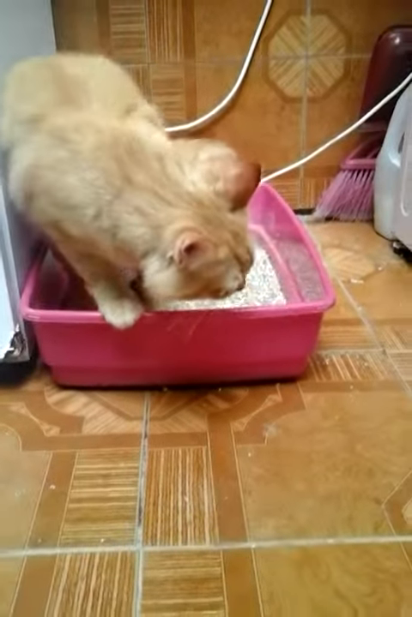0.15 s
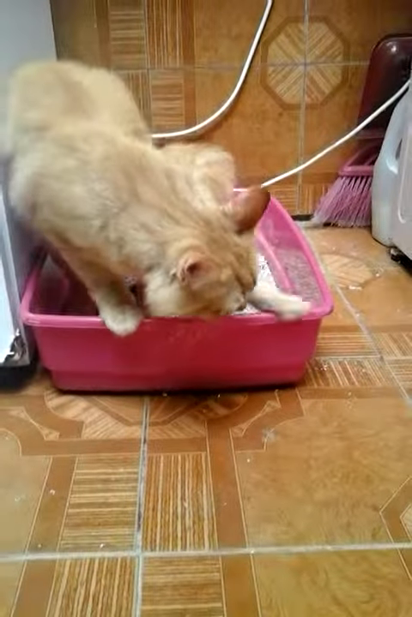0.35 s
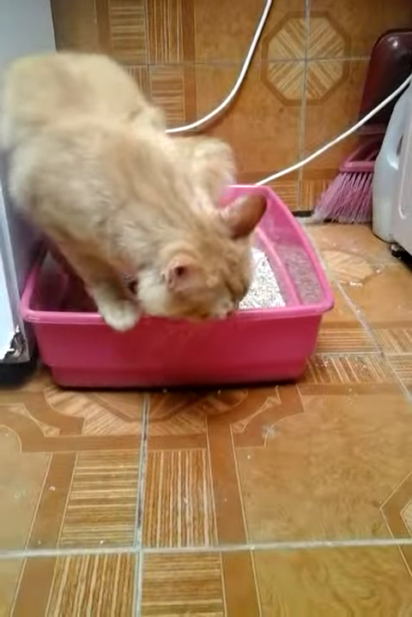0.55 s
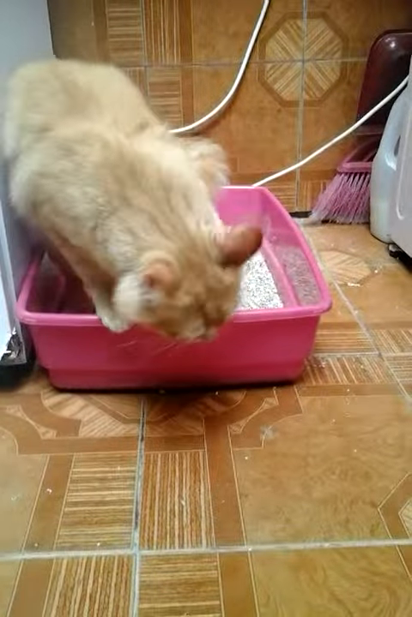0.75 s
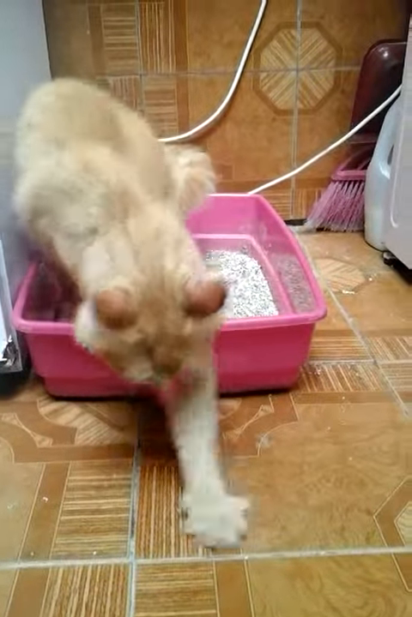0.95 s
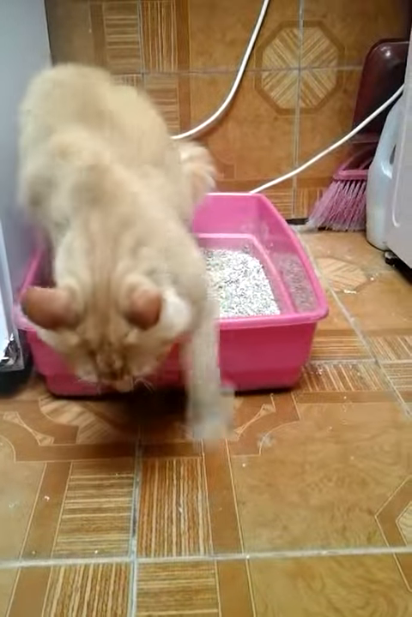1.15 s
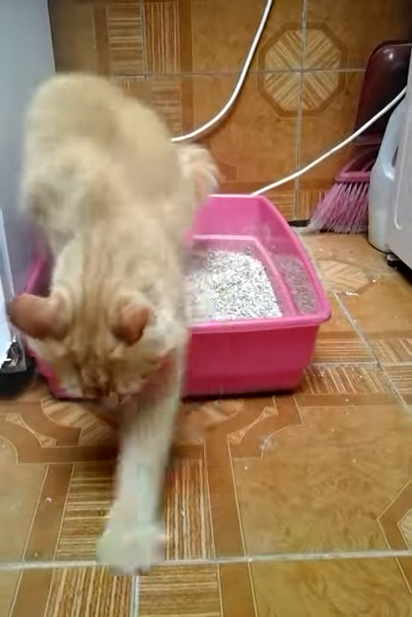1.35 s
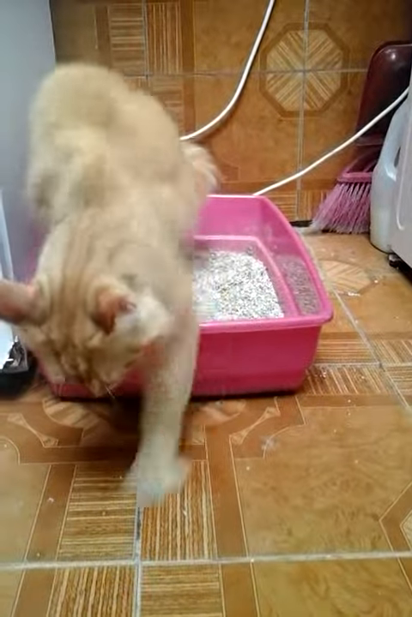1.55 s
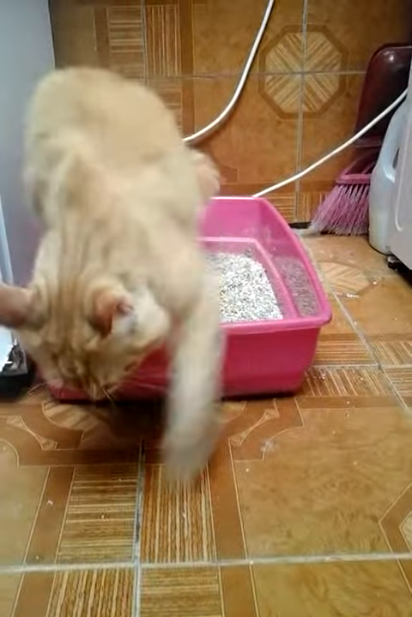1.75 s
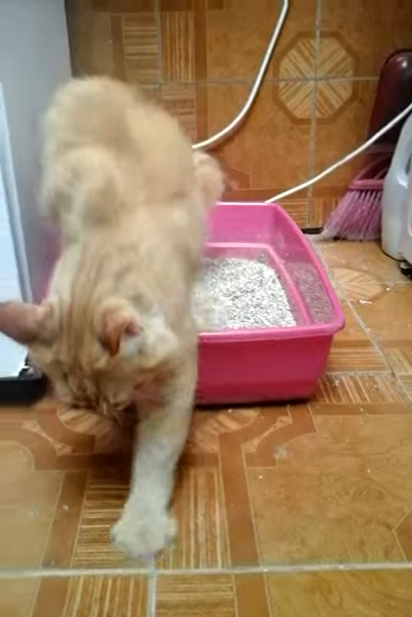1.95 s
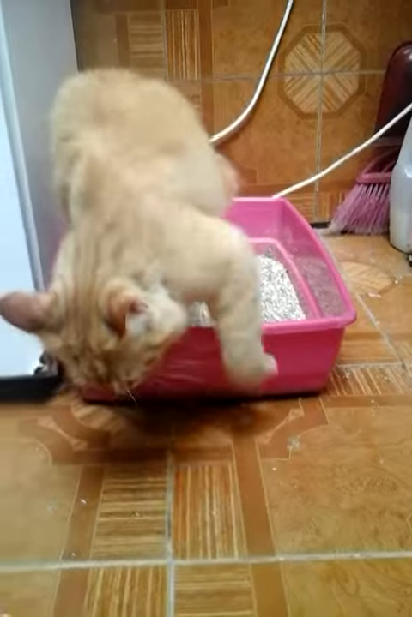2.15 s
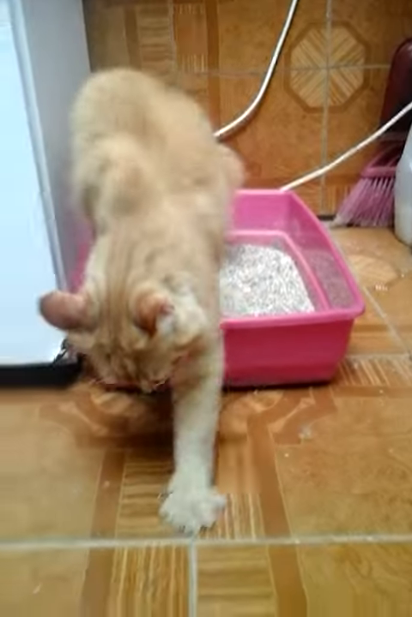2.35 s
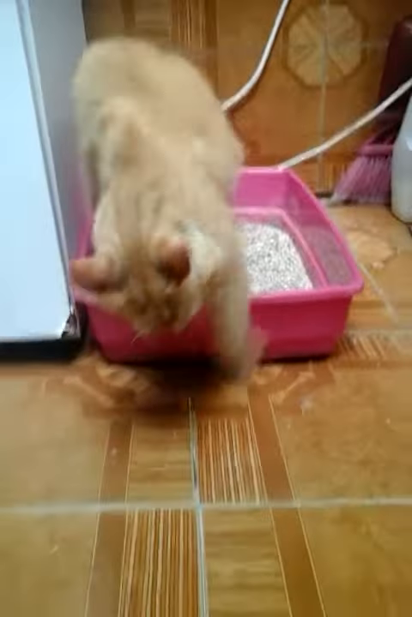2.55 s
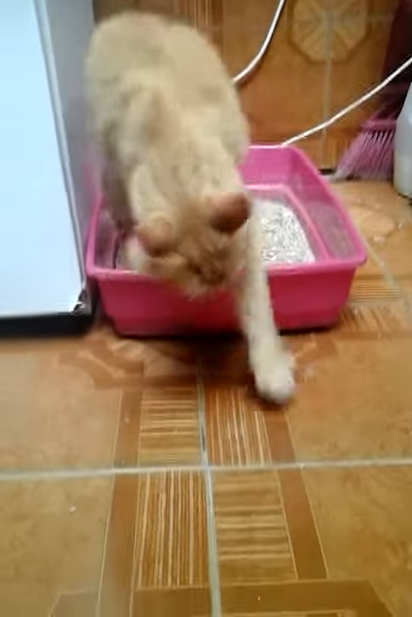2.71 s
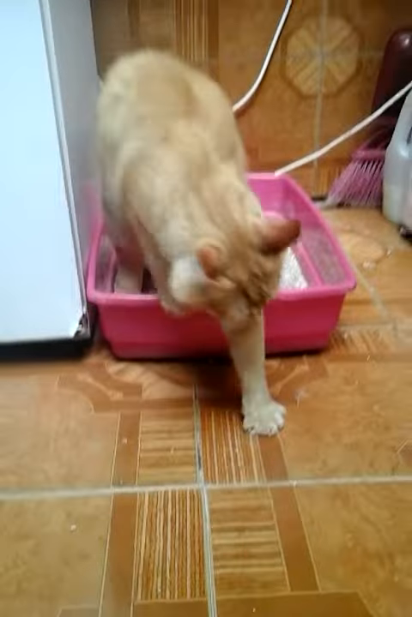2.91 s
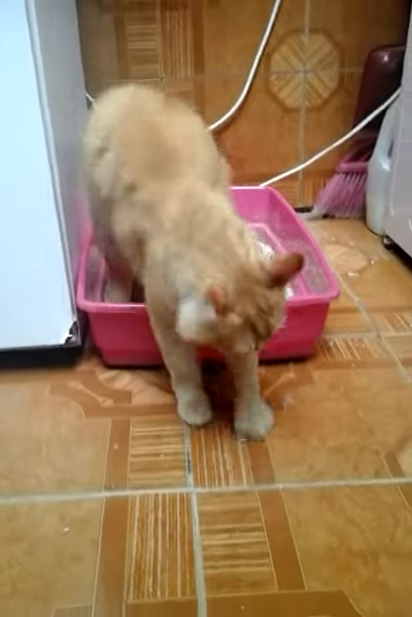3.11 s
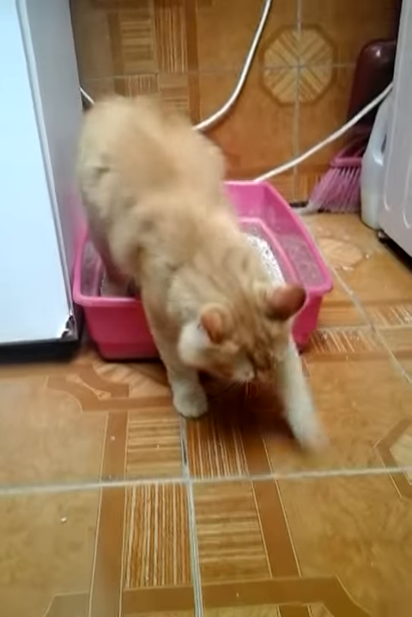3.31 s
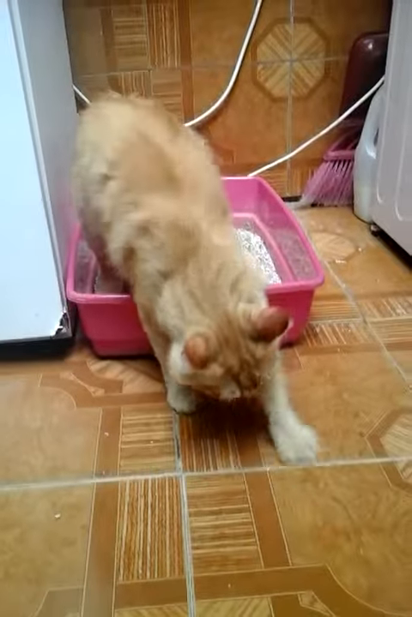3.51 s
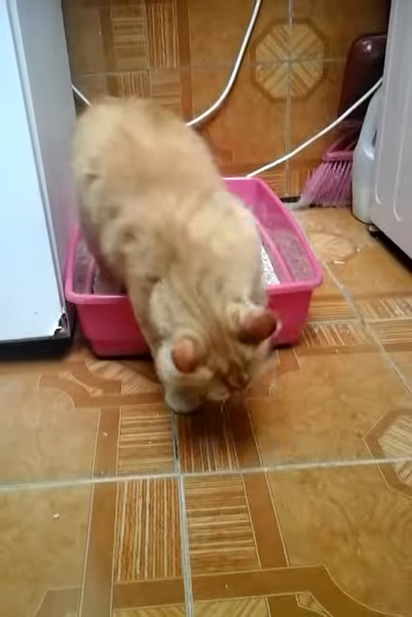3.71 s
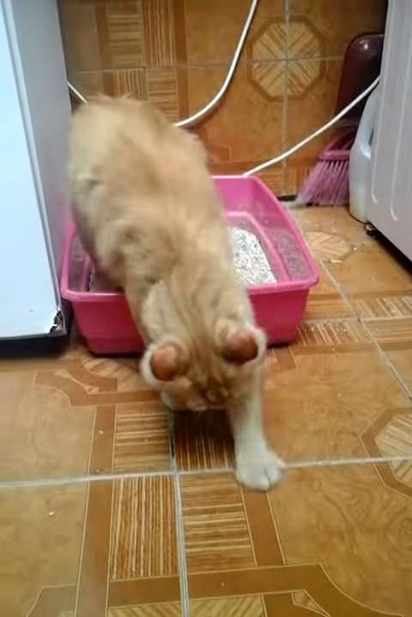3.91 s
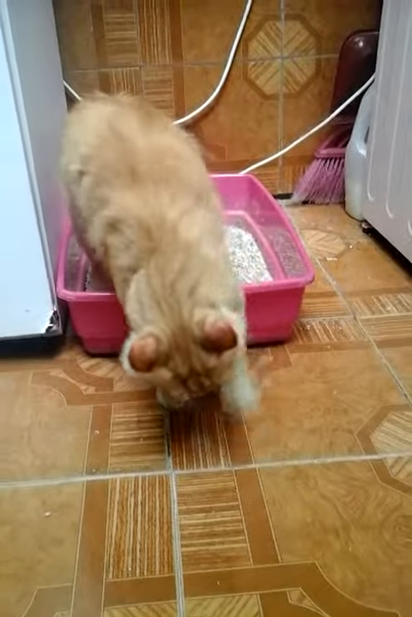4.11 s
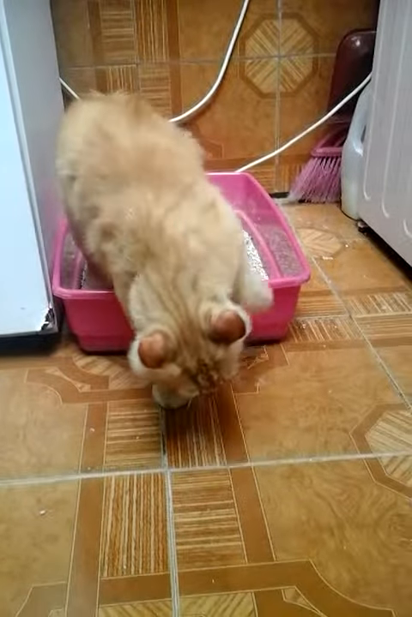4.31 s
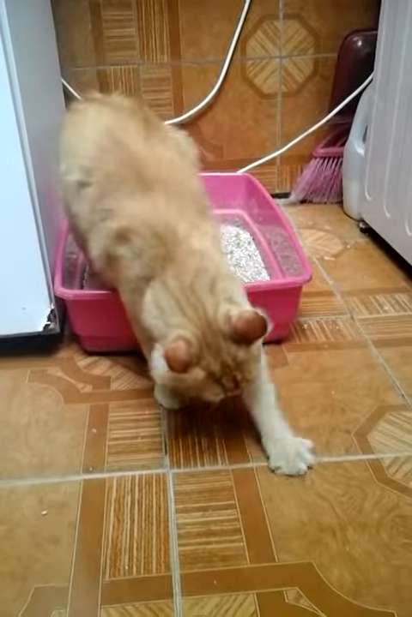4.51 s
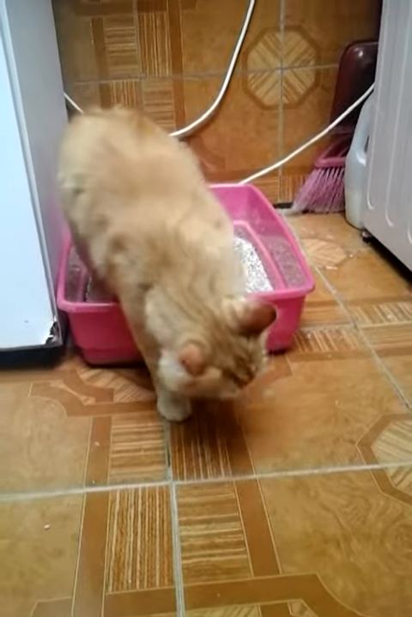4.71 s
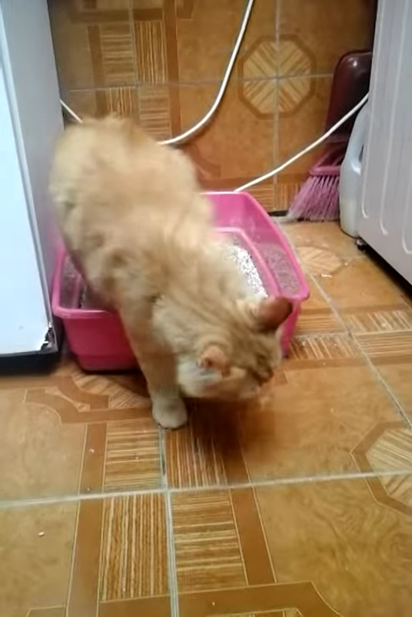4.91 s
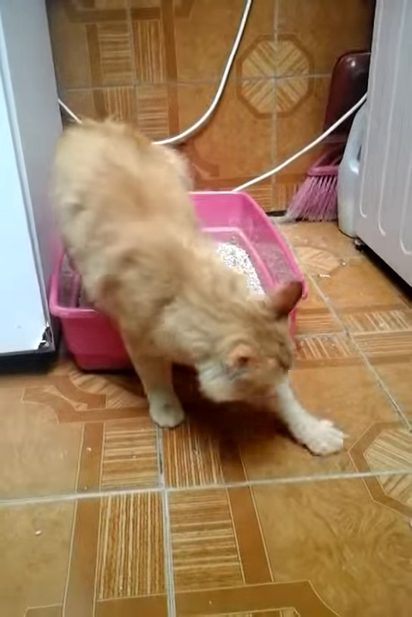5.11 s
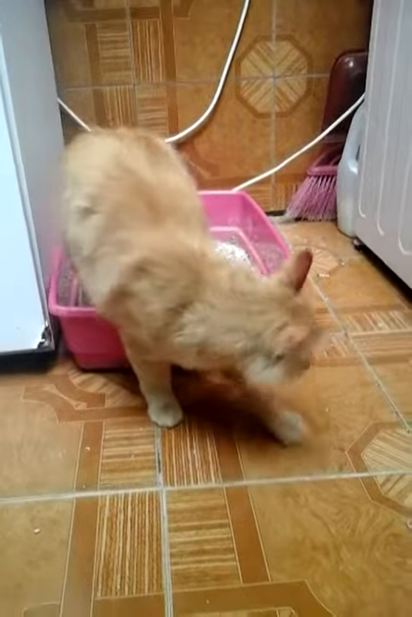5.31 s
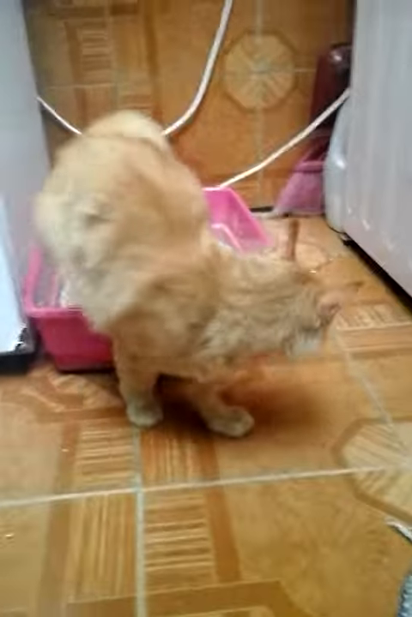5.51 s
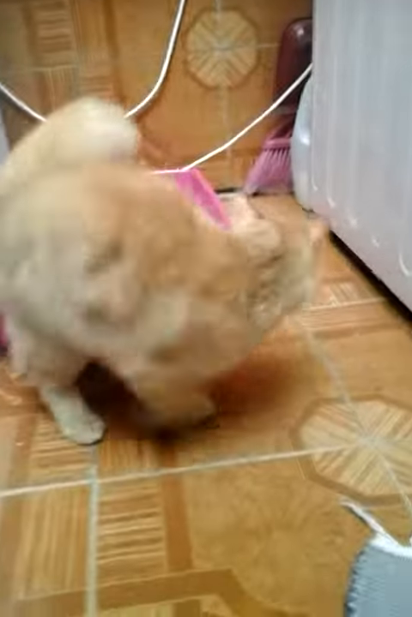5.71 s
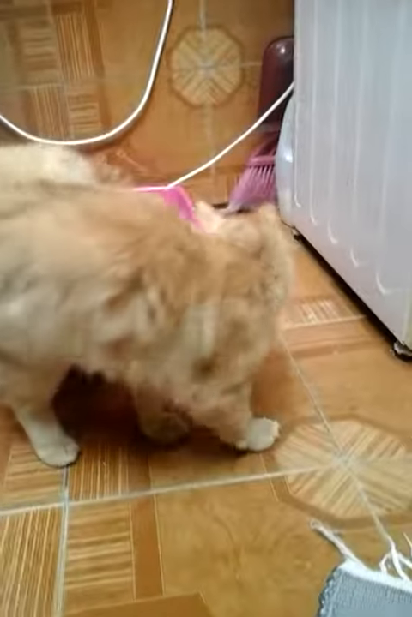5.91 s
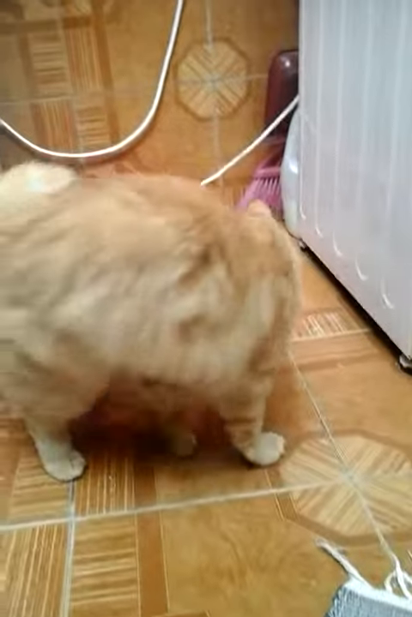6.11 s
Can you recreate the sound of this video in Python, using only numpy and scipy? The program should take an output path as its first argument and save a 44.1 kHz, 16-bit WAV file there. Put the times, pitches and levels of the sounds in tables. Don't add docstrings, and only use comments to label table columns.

```python
import sys
import numpy as np
from scipy import signal
from scipy.fft import rfft, irfft, next_fast_len
from scipy.io import wavfile
from scipy.ndimage import uniform_filter1d

SR = 44100
rng = np.random.default_rng(int(sys.argv[2]) if len(sys.argv) > 2 else 0)


def natural_amplitude(level_db):
    exponent = np.asarray(level_db, float) / 20
    return 10 ** exponent


def master_out(mix):
    frames = np.transpose(np.atleast_2d(mix))
    ceiling = np.clip(frames, -1, 1)
    pcm = np.round(ceiling * 32767).astype(np.int16)
    wavfile.write(sys.argv[1], SR, pcm)


N = 275757

# start_s, peak_db, contact_ms
KNOCKS = [(0.0867, -36, 0.28), (0.127, -39.5, 1.9), (0.3802, -48.5, 0.45), (0.3826, -44.5, 1.22),
          (0.5085, -48, 0.61), (0.512, -54, 0.39), (1.1473, -47, 1.23), (1.2574, -27.5, 0.46),
          (1.2622, -27.5, 0.76), (1.551, -53, 0.83), (1.7135, -19, 0.47), (1.7174, -27, 0.91),
          (2.0219, -43, 0.495), (2.1568, -14, 0.4), (2.1589, -45, 0.35), (2.1622, -50.5, 0.24),
          (2.6333, -18.5, 0.48), (3.2697, -47.5, 1.1), (3.6834, -6.5, 0.29), (3.6878, -7, 0.56),
          (3.6895, -8, 0.39), (4.2238, -9.5, 0.33), (4.7729, -18, 0.3), (4.7752, -15.5, 0.48),
          (4.8781, -28, 0.36)]
# mode_hz, level_db, t60_s
TRAY_MODES = [(231, -26, 0.023), (359.3, -11, 0.08), (414.4, -17.5, 0.078), (484, -24, .05),
              (655, -29, 0.049), (689, -6.5, 0.071), (800, -17, 0.021), (1030, -18.5, 0.02),
              (1100, -32.5, 0.095), (1340, -34, 0.065), (1440, -28.5, .1), (1850, -35.5, 0.025),
              (2130, -28, .03)]
# start_s, peak_db, panel_hz, panel_db, floor_db (panel and floor over the crack)
CRACKS = [
    (1.257, -50.5, 984, 14.5, -6),
    (1.7135, -44.5, 788, 13, -12.5),
    (2.1585, -28, 792, -1, -20),
    (2.6324, -45.5, 816, 12, -22),
    (3.682, -25, 1359, 6.5, -47),
    (3.6884, -27.5, 767, 12, -25.5),
    (4.2243, -24.5, 933, 6, -26),
    (4.7701, -40.5, 1187, 14.5, -47.5),
]
# start_s, peak_db, pitch_hz, left_minus_right_db
TICKS = [(0.0656, -31.5, 5130, -5), (0.0862, -32, 4940, -2), (0.3521, -46, 9000, 4), (0.378, -37, 5070, -6),
         (0.506, -44, 5210, -12), (1.0178, -50, 6000, 0), (1.4311, -47, 5640, 0), (1.522, -50, 5170, -2.5),
         (1.9001, -43.5, 6700, 2.5), (2.0214, -45, 5770, -8), (2.1577, -21, 4780, -5),
         (2.3639, -42.5, 5400, 9), (2.596, -46.5, 5280, 14), (3.2006, -49.5, 5840, -16),
         (3.4323, -53.5, 5310, 7), (3.616, -34.5, 7000, 4), (4.141, -45, 5400, 5),
         (4.3181, -45, 5560, -5.5), (4.4947, -55, 5614, 0.5), (4.7712, -18.5, 6000, 5),
         (4.8414, -27.5, 5400, 6), (4.8647, -35, 5400, -16), (4.9645, -35, 7340, -21),
         (5.1144, -46.5, 6240, 1.5), (5.1968, -36, 7950, -12), (5.7608, -55, 5700, -3),
         (5.7805, -44, 7950, -17.5), (5.7879, -53, 5210, -17.5), (5.7957, -31.5, 8330, -21),
         (6.0831, -51, 4960, -2.5)]
# start_s, rise_s, fade_s_per_10db, hiss_db,
# left_minus_right_db
STROKES = [(1.1, 0.065, 0.15, -56.5, -1), (1.515, 0.017, 0.2, -61.5, -4.5), (1.56, 0.093, 0.03, -59, -1),
           (2.0, 0.055, 0.35, -57, -2), (2.48, .047, 0.38, -61.5, -2), (2.58, 0.12, 0.3, -65, -6),
           (3.5, 0.21, 0.21, -60.5, -2), (4.04, .12, 0.19, -61, -2.5), (4.3, .03, .037, -53, -4.5),
           (4.62, 0.072, 0.15, -61, -2), (4.82, .11, 0.02, -54, -2.5),
           (0, .01, .15, -58.5, 1),
    (0.099, 0.016, 0.018, -53, -2.5),
    (.39, .16, 0.029, -58, -2),
    (1.8, 0.13, 0.064, -75.5, 6),
    (5.15, 0.0514, .09, -67, -2.5),
    (5.47, 0.157, .075, -73, -5),
    (5.755, 0.043, .025, -59, -4),
    (6.07, 0.0276, .04, -69, -2),
]
# start_s, fade_s_per_10db, hiss_db, left_minus_right_db
THROWS = [
    (1.256, 0.06, -55.5, 1),
    (1.711, 0.2, -61, 2.5),
    (2.152, 0.1057, -61, -6),
    (3.68, 0.0633, -41, 0.5),
    (3.76, 0.24, -62.5, 0),
    (4.221, 0.23, -63, 6),
    (4.769, 0.0255, -37.5, -5),
    (4.79, 0.0447, -43, -2.5),
    (4.97, 0.2, -69.5, 3),
]
# start_s, fade_s_per_10db, hiss_db, left_minus_right_db; a negative fade is silent
FLICKS = [
    (.063, -0.07, -52, -6.5),
    (.084, -0.0442, -43.5, 2),
    (.35, .03, -64.5, 1),
    (.373, 0.09, -59.5, -1.5),
    (.585, 0.2, -73, 4),
    (1.015, 0.4, -68, -0.5),
    (3.186, 0.15, -68.5, 1.5),
    (3.43, 1.15, -69.5, 2.5),
    (4.961, -0.0254, -51, 0),
    (5.8, -0.3, -65.5, 5.5),
]
# freq_hz, density_db
FINE_GRIT = [(1000, -22.5), (2500, -17), (4000, -5), (5800, -3), (8000, -4.5), (10500, -7.5),
             (14000, -11.5)]
# freq_hz, density_db
COARSE_GRIT = [(600, -5.5), (1500, -1), (3000, -2), (5500, -10), (9000, -19.5), (14000, -40)]
# freq_hz, t60_s, level_db
ROOM = [(96, 0.86, -7.5), (238, 0.47, -0.5), (570, 0.39, 1), (1207, 0.42, -2.5), (2600, 0.34, 0),
        (6000, 0.32, -4.5), (12000, 0.32, -11)]
# multiple, level_db
MOTOR_ORDERS = [(1, 0), (2, -20), (3, -11), (4, -22), (5, -21), (7, -25)]
# time_s, turn_rate_hz
MOTOR_HZ = [(0, 52.6), (2, 46), (4.5, 36.3), (6.3, 28.5)]
# time_s, level_db
MOTOR_DB = [(0, -67), (1, -70), (2, -79), (2.5, -84), (3.5, -71), (4, -66.5), (4.7, -76), (5.25, -72.5),
            (6.3, -75.5)]
# time_s, level_db
HOUSE_DB = [(0.0, -60.5), (0.35, -79), (0.5, -60), (0.85, -95.5), (1.29, -63), (1.58, -75.5), (2.21, -64),
            (2.58, -71.5), (2.75, -63), (3.03, -82.5), (3.661, -69), (3.86, -60), (4.05, -74), (4.37, -68),
            (4.72, -85.5), (4.98, -62), (5.599, -104), (5.8, -78.5)]
# freq_hz, density_db
RUMBLE = [(18, -40), (30, -2), (60, 0.5), (100, 0), (200, -4.5), (400, -13), (1000, -28), (3000, -56)]
# freq_hz, density_db
PORT_HISS = [(20, -11), (60, 0), (150, 1.5), (400, -8.5), (1000, -15), (3000, -20), (8000, -24.5),
             (15000, -19)]
# peak_hz, width_hz, lift_db, gain_db
PORTS = [(7190, 2100, 4, 3), (5400, 800, 9.5, 0.17)]


def colour(x, points):
    hz, db = np.transpose(points)
    size = next_fast_len(x.shape[-1])
    log_f = np.log(np.arange(size // 2 + 1) * SR / size + 1)
    gain = natural_amplitude(np.interp(log_f, np.log(hz), db))
    return irfft(rfft(x, size) * gain, size)[..., :x.shape[-1]]


def level(x, db):
    return x * natural_amplitude(db) / np.sqrt(np.mean(x ** 2))


def band(x, hz, width_hz):
    return signal.lfilter(*signal.iirpeak(min(hz, .45 * SR), hz / width_hz, SR), x)


def walk(rate_hz):
    hold = int(SR / rate_hz)
    steps = np.repeat(rng.standard_normal(N // hold + 1), hold)
    return 1.3 * uniform_filter1d(uniform_filter1d(steps, hold), hold)[:N]


def diffuse(size, port_gap_m=0.19):
    same, other = rfft(rng.standard_normal((2, size)))
    alike = np.sinc(2 * np.arange(len(same)) * SR / size * port_gap_m / 343)
    mid = same * np.sqrt(1 + alike)
    side = other * np.sqrt(1 - alike)
    return irfft(np.array([mid + side, mid - side]), size) / 2 ** .5


def add(out, x, start_s):
    i = max(int(start_s * SR), 0)
    out[..., i:i + x.shape[-1]] += x[..., :N - i]


def decaying_sine(hz, t60_s, t):
    return np.sin(2 * np.pi * hz * t) * 1000. ** (-t / t60_s)


def knocks(lead=0.092, ring_db=-3, spread_db=4.0, low_hz=170):
    out, t = np.zeros(N), np.arange(int(.25 * SR)) / SR
    hz, db, t60_s = (c[:, None] for c in np.transpose(TRAY_MODES))
    chance = rng.standard_normal((len(KNOCKS), 2, len(TRAY_MODES), 1))
    for (s, peak_db, contact_ms), (place, detune) in zip(KNOCKS, chance):
        u = (t[:int(.004 * SR)] - .002) / (contact_ms * 0.00058)
        force = np.exp(-u ** 2 / 2)
        push = -(1 - u ** 2) * force * (1 + lead * np.tanh(u))
        modes = natural_amplitude(db + spread_db * place) * decaying_sine(hz * (1 + .015 * detune), t60_s, t)
        ring = np.convolve(modes.sum(axis=0), force / force.sum())
        add(out, natural_amplitude(peak_db) * push, s - .002)
        add(out, natural_amplitude(peak_db + ring_db) * ring, s - .0015)
    return signal.sosfilt(signal.butter(2, low_hz, "highpass", fs=SR, output="sos"), out)


def cracks(fade_ms=1.9, gain_db=5, mid_hz=2604.0, high_hz=5914.0, claw_db=-56, panel_t60_s=0.039,
           floor_hz=178.8, floor_t60_s=0.12, floor_gain_db=12):
    out, t = np.zeros((2, N)), np.arange(int(.2 * SR)) / SR
    noise = rng.standard_normal((len(CRACKS), 3, len(t)))
    for (s, db, panel_hz, panel_db, floor_db), grit in zip(CRACKS, noise):
        grit = grit[0] + 0.49 * grit[1:]
        grit = grit * np.exp(-t * 1000 / fade_ms) * np.clip(t * 3000, 0, 1)
        middle = band(band(grit, mid_hz, 1.1 * mid_hz), mid_hz, 1.1 * mid_hz)
        high = band(band(grit, high_hz, high_hz), high_hz, high_hz)
        edge = (middle + natural_amplitude(claw_db - db) * high) / abs(middle).max()
        panel = natural_amplitude(panel_db) * decaying_sine(panel_hz, panel_t60_s, t) * np.clip(t * 700 - 1.1, 0, 1)
        floor = natural_amplitude(floor_db + floor_gain_db) * decaying_sine(floor_hz, floor_t60_s, t)
        add(out, natural_amplitude(db + gain_db) * (edge + panel + floor), s)
    return out


def drag(per_s=4500., size_db=-0.5, smooth_db=-3, stroke_fine=0.67, spray_fine=0.33,
         stroke_drum_db=-13, spray_drum_db=-13):
    strokes = pressure(STROKES + sudden(FLICKS))
    sprays = pressure(sudden(THROWS))
    total = strokes + sprays
    fine = np.clip((stroke_fine * strokes + spray_fine * sprays) / (total + 1e-18), 0, 1)
    hit = rng.random((2, N)) < per_s / SR
    size = np.minimum(rng.exponential(size=(2, N)), 4)
    grains = level(hit * natural_amplitude(size_db * size) * rng.standard_normal((2, N)), 0)
    grains = grains + natural_amplitude(smooth_db) * rng.standard_normal((2, N))
    flicker = natural_amplitude(walk(60.))
    hiss = fine * level(colour(grains, FINE_GRIT), 0) + (1 - fine) * level(colour(grains, COARSE_GRIT), 0)
    body = sum(natural_amplitude(db) * band(grains[0], hz, 6 / t60_s) for hz, db, t60_s in TRAY_MODES)
    drum_power = strokes * natural_amplitude(2 * stroke_drum_db) + sprays * natural_amplitude(2 * spray_drum_db)
    drum = np.sqrt(drum_power.mean(axis=0))
    return hiss * flicker * np.sqrt(total), level(body, 0) * flicker * drum


def sudden(rows, rise_s=0.0076):
    return [(s, rise_s, *rest) for s, *rest in rows]


def pressure(rows, press_power=0.56):
    power = np.zeros((2, N))
    for s, rise_s, fade_s, db, pan_db in rows:
        t = np.arange(int((rise_s + 6 * fade_s) * SR)) / SR
        fading = natural_amplitude(db - 10 * np.maximum(t - rise_s, 0) / fade_s)
        shape = np.minimum(t / rise_s, 1) ** press_power * fading
        add(power, shape ** 2 * natural_amplitude(np.array([[pan_db], [-pan_db]])), s)
    return power


def ticks(ring_ms=0.91, gain_db=-5, width_share=1, narrowing=0.45):
    out, t = np.zeros((2, N)), np.arange(int(.008 * SR)) / SR
    for (s, db, hz, pan_db), grain in zip(TICKS, rng.standard_normal((len(TICKS), 2, len(t)))):
        crack = grain * np.exp(-t * 1000 / ring_ms) * np.clip(t * 5000, 0, 1)
        width_hz = np.clip(width_share * natural_amplitude(-narrowing * (db + 47.5)), .2, 2.2) * hz
        crack = band(band(crack, hz, width_hz), hz, width_hz)
        side_db = np.array([[.5], [-.5]]) * pan_db
        add(out, natural_amplitude(db + gain_db + side_db) * crack / abs(crack).max(), s)
    return out


def room(x, wet_db):
    turn_rad = 2.9 * np.arange(N) / SR
    wet = sum(signal.fftconvolve(np.atleast_2d(x * share), echoes(), axes=1)
              for share in (np.cos(turn_rad), np.sin(turn_rad)))
    return natural_amplitude(wet_db) * wet[:, :N]


def echoes(gap_s=0.00058, swell_s=0.0041, early_db=7, early_s=0.024):
    t = np.arange(int(.6 * SR)) / SR
    noise, tail = diffuse(len(t)), 0
    hz, t60_s, db = np.transpose(ROOM)
    shape = np.clip((t - gap_s) / swell_s, 0, 1) * (1 + natural_amplitude(early_db) * np.exp(-t / early_s))
    for f in 70 * 2 ** np.arange(0, 8, .5):
        decay_s, gain_db = (np.interp(np.log(f), np.log(hz), c) for c in (t60_s, db))
        edges_hz = [f / 2 ** 0.24, f * 2 ** 0.24]
        part = signal.sosfilt(signal.butter(2, edges_hz, "bandpass", fs=SR, output="sos"), noise)
        part = part * shape * 1000. ** (-t / decay_s)
        energy = np.sum(part ** 2, axis=1, keepdims=True)
        tail = tail + natural_amplitude(gain_db) * part * np.sqrt(f * decay_s / energy)
    return tail


def motor(waver_db=1.2):
    t = np.arange(N) / SR
    phase = 2 * np.pi * np.cumsum(np.interp(t, *np.transpose(MOTOR_HZ))) / SR
    tone = sum(natural_amplitude(order_db + waver_db * k ** .5 * walk(5.)) * np.sin(k * phase + k)
               for k, order_db in MOTOR_ORDERS)
    return 2 ** .5 * tone * natural_amplitude(np.interp(t, *np.transpose(MOTOR_DB)))


def house_db():
    return np.interp(np.arange(N) / SR, *np.transpose(HOUSE_DB))


def air():
    return level(colour(diffuse(N), RUMBLE), 4.9) * natural_amplitude(house_db() + walk(9.))


def port_hiss(follow=.15):
    hiss = level(colour(rng.standard_normal((2, N)), PORT_HISS), -65)
    return hiss * natural_amplitude(follow * (house_db() + 73.0))


def scene():
    hiss, body = drag()
    raps = knocks() + cracks() + body
    fine = natural_amplitude(-1) * hiss + ticks()
    wet = room(raps + natural_amplitude(-6.5) * fine, wet_db=-37.5)
    return raps + fine + wet + motor() + air()


def top_cut(x):
    return signal.sosfilt(signal.butter(12, 15770, fs=SR, output="sos"), x)


def record(dry, top_hz=14550):
    heard = dry + port_hiss()
    ports = np.array([natural_amplitude(gain_db) * (x + (natural_amplitude(lift_db) - 1) * band(x, hz, width_hz))
                      for x, (hz, width_hz, lift_db, gain_db) in zip(heard, PORTS)])
    ports = signal.sosfilt(signal.ellip(10, .2, 70, top_hz, fs=SR, output="sos"), ports)
    return top_cut(ports * np.array([[1], [-1]]))


dry = scene()
out = record(dry)
master_out(out)
```